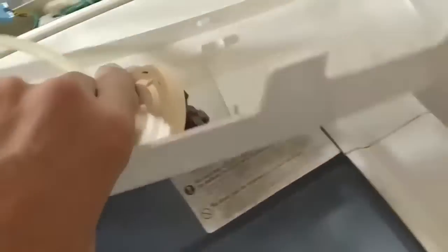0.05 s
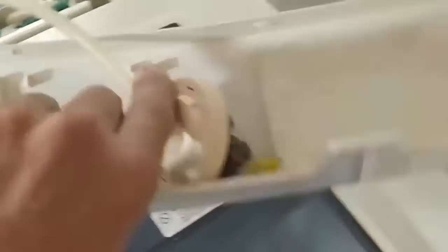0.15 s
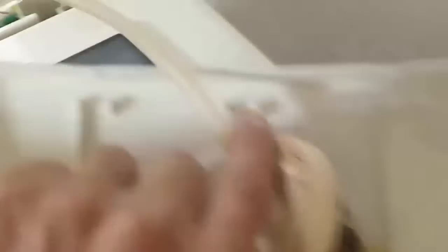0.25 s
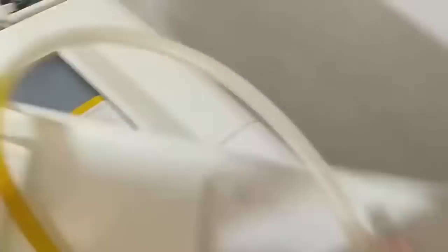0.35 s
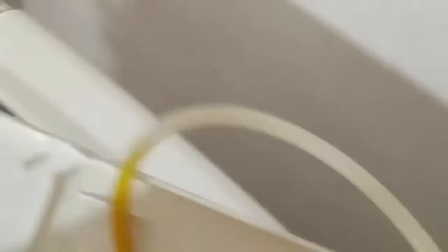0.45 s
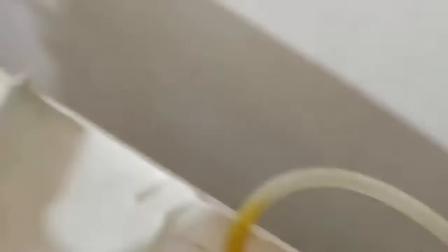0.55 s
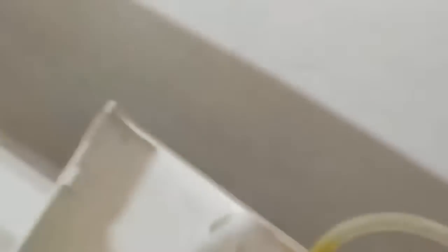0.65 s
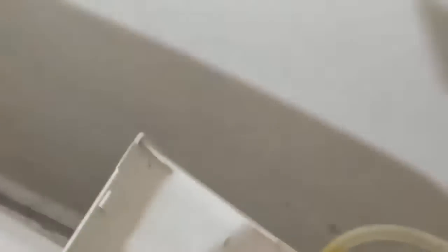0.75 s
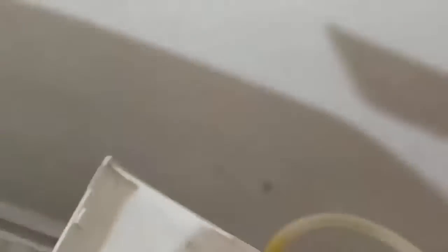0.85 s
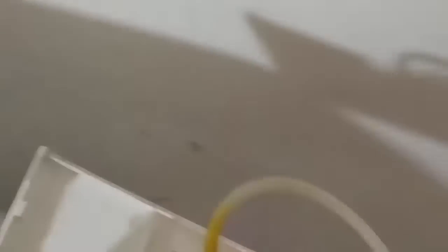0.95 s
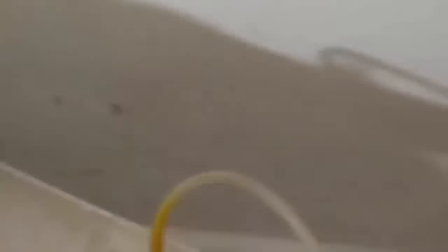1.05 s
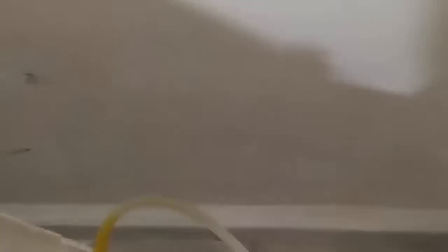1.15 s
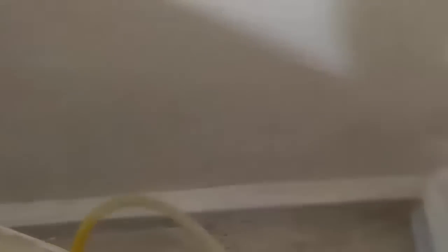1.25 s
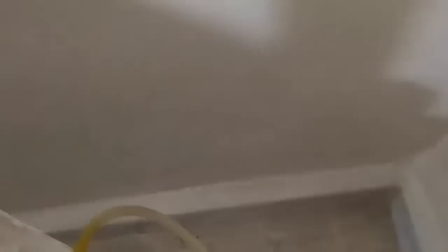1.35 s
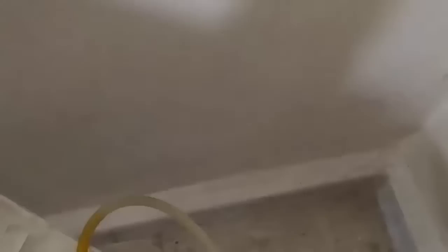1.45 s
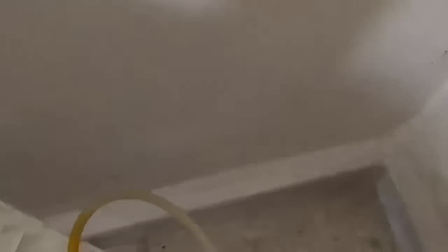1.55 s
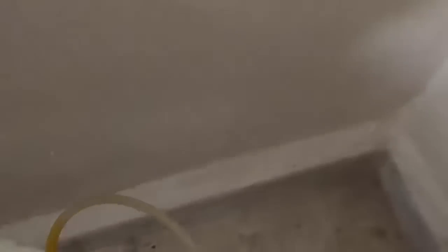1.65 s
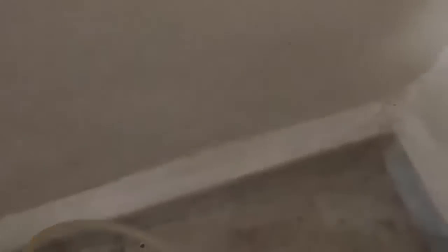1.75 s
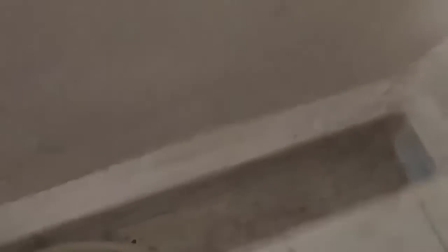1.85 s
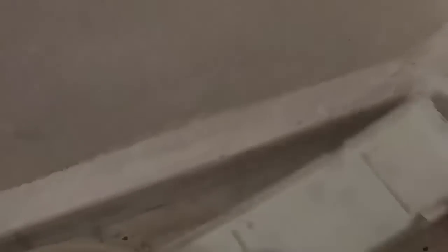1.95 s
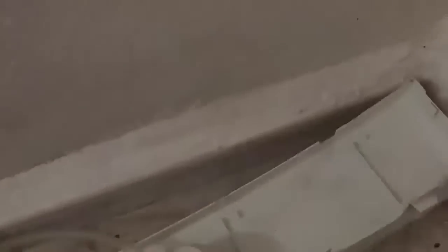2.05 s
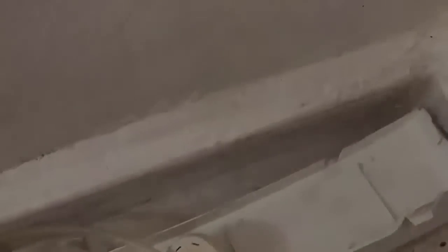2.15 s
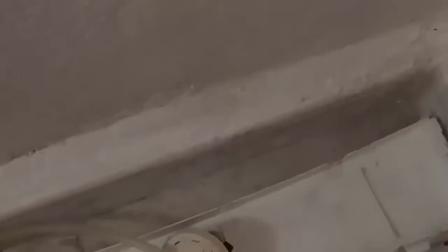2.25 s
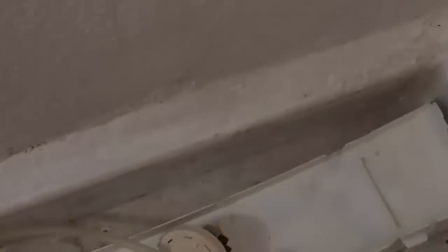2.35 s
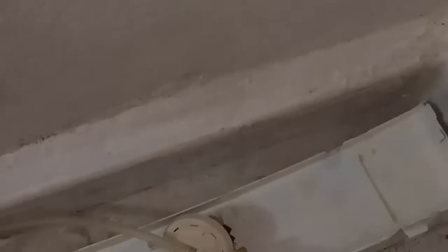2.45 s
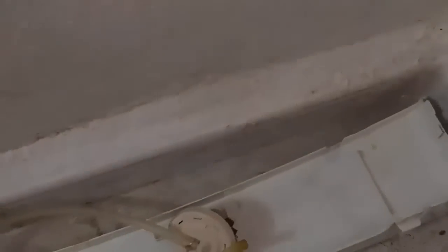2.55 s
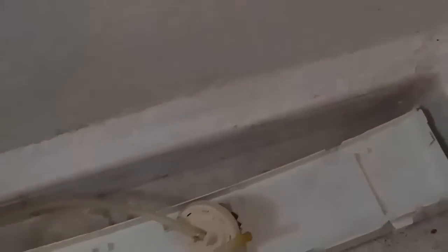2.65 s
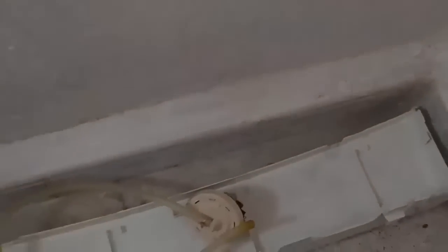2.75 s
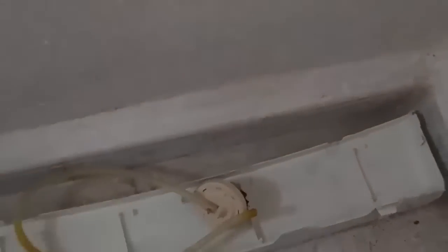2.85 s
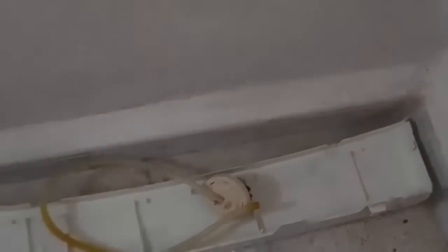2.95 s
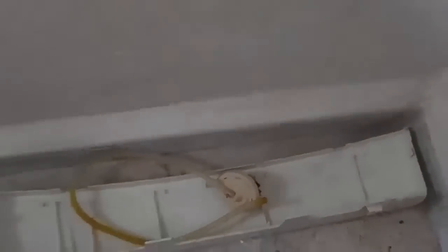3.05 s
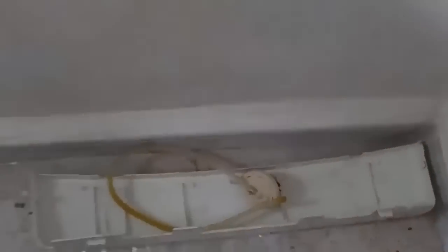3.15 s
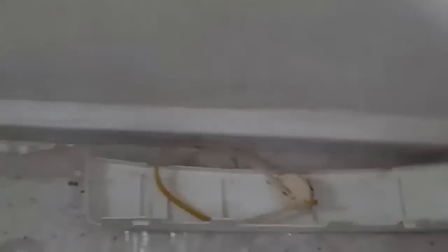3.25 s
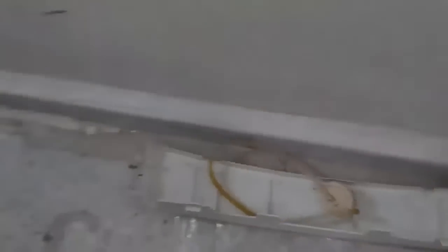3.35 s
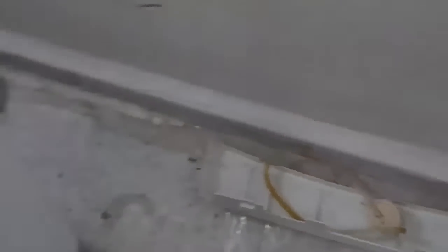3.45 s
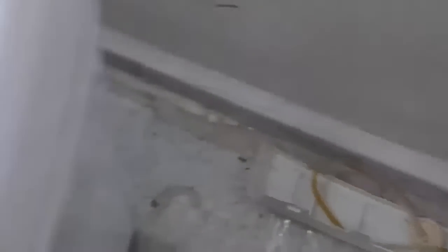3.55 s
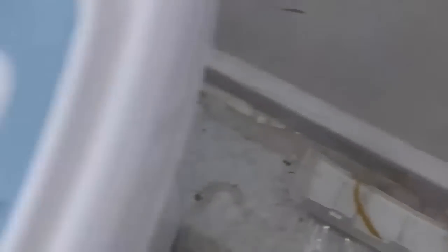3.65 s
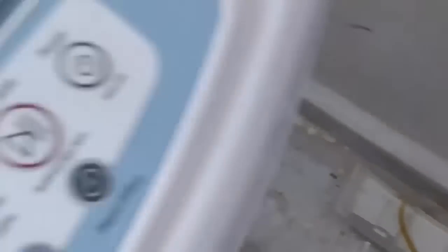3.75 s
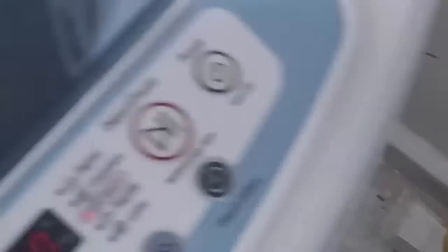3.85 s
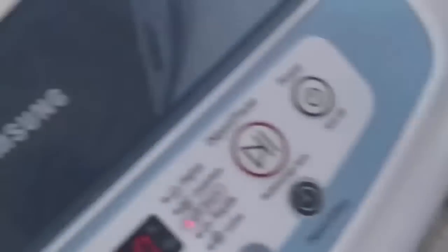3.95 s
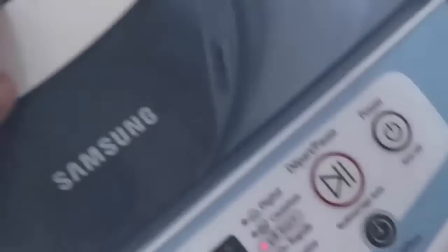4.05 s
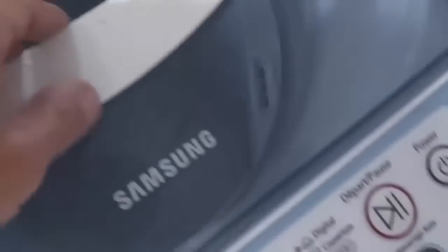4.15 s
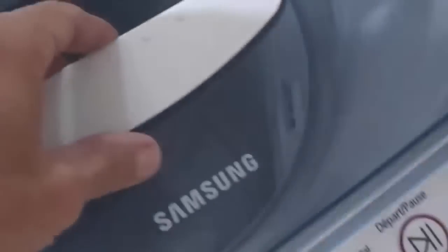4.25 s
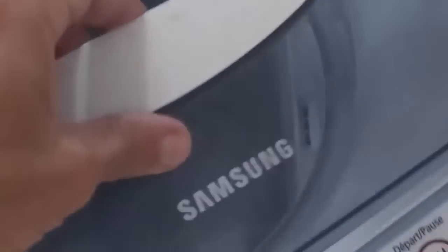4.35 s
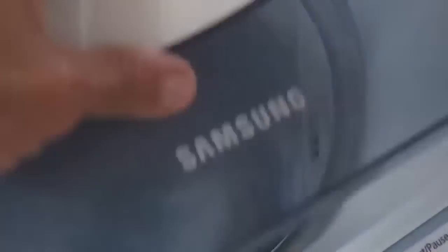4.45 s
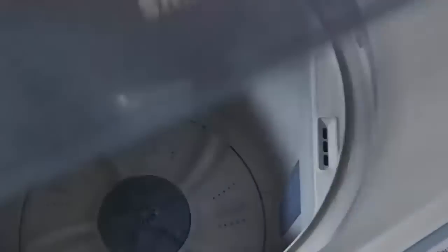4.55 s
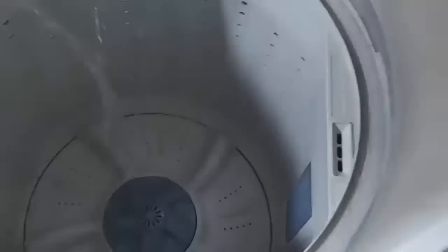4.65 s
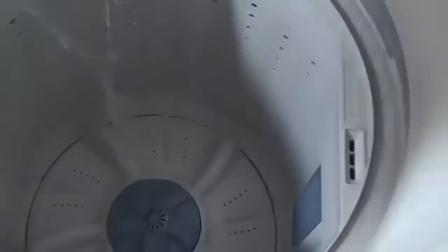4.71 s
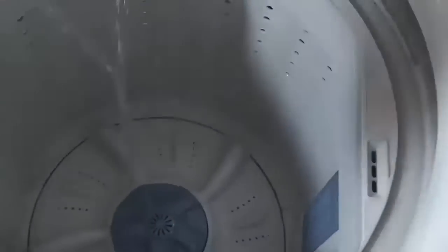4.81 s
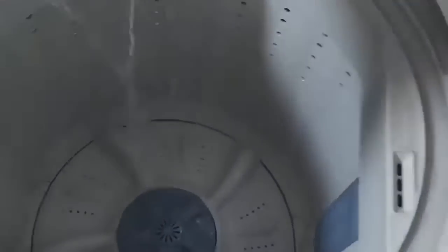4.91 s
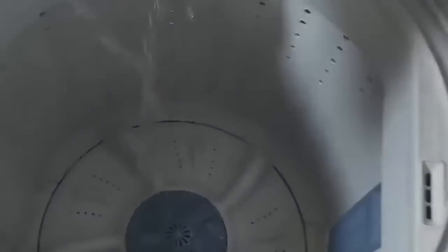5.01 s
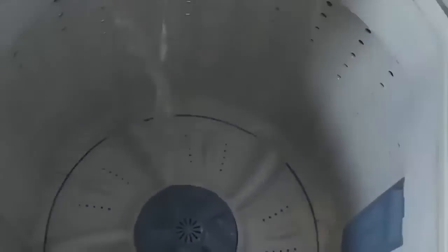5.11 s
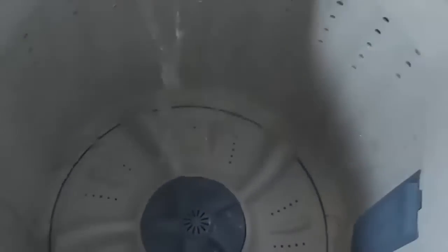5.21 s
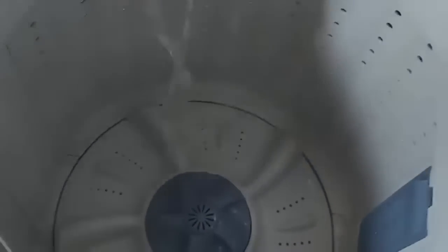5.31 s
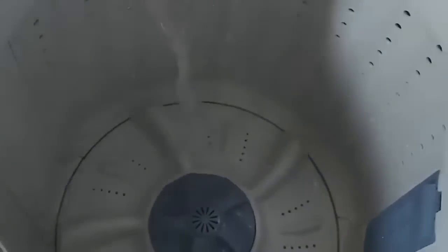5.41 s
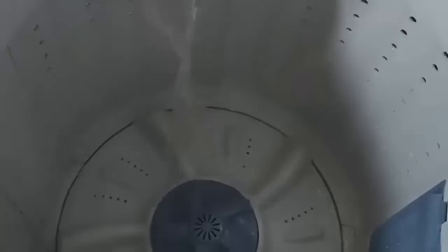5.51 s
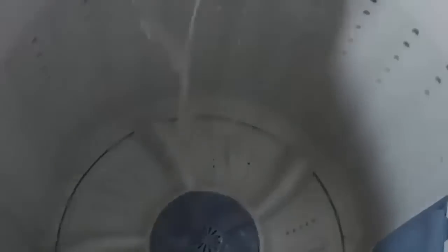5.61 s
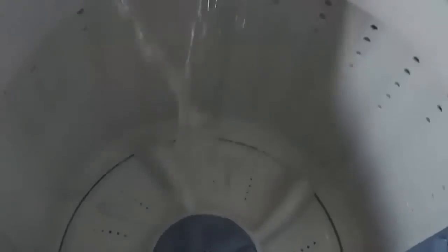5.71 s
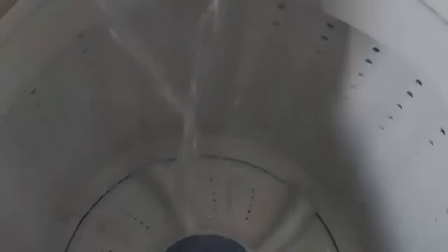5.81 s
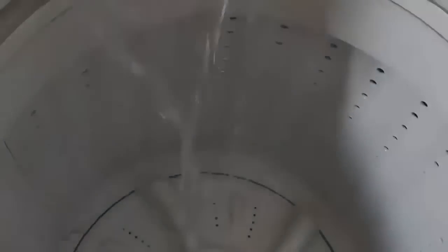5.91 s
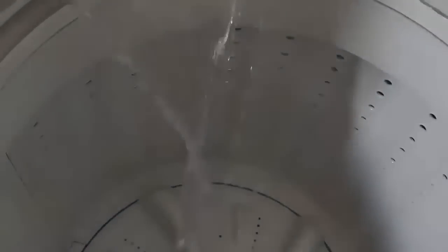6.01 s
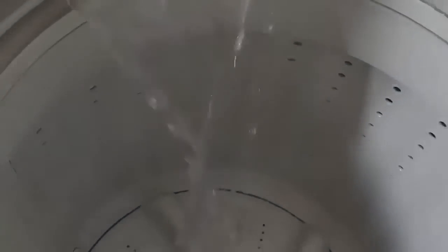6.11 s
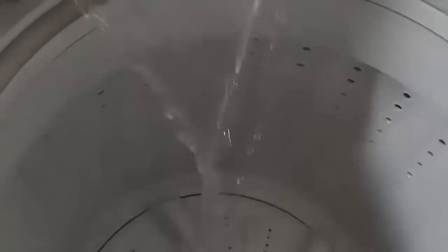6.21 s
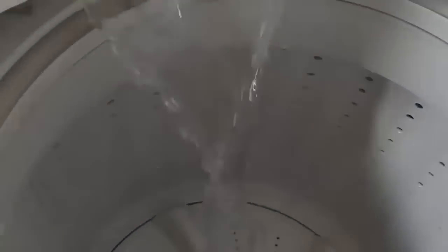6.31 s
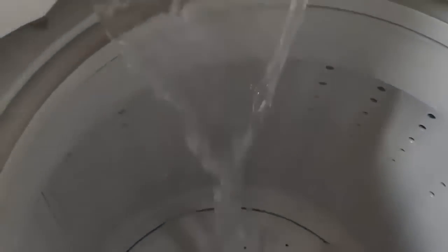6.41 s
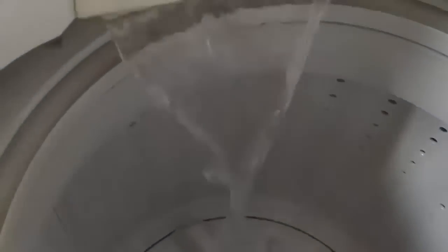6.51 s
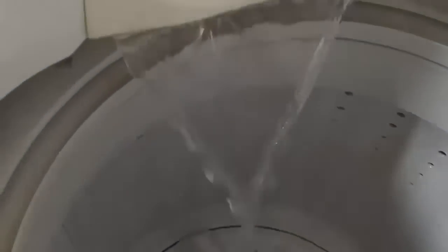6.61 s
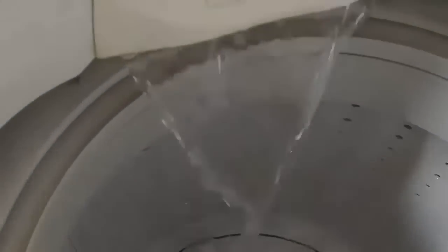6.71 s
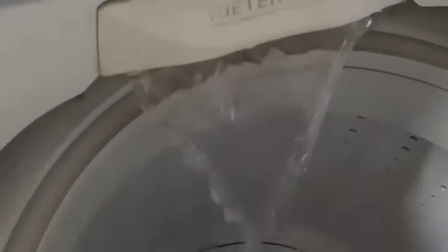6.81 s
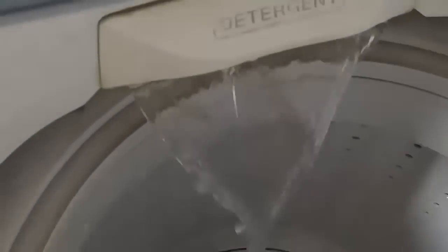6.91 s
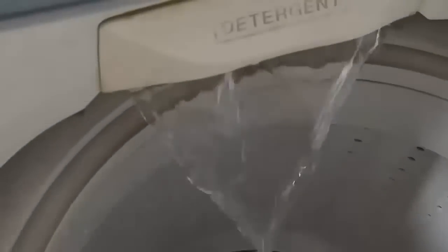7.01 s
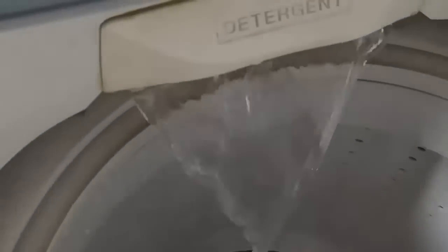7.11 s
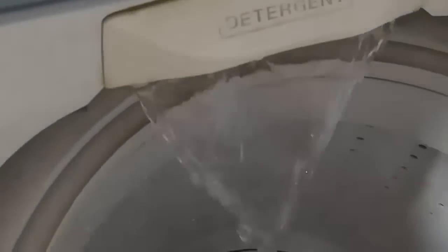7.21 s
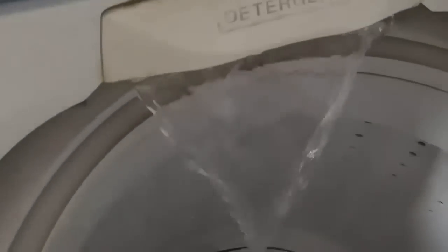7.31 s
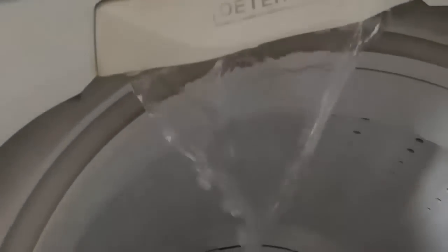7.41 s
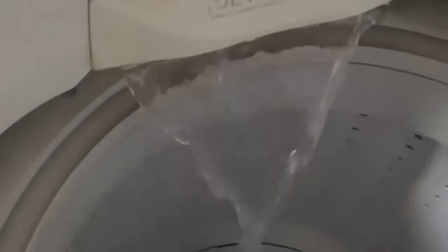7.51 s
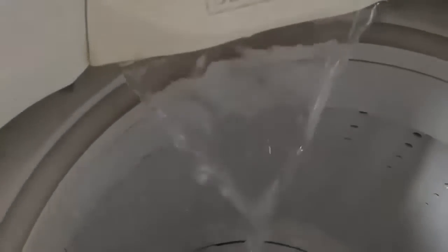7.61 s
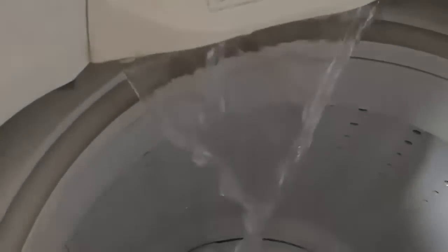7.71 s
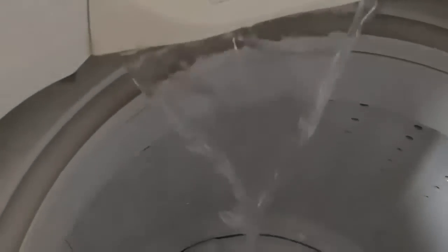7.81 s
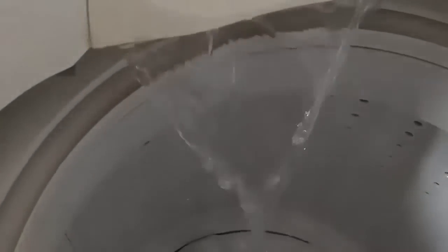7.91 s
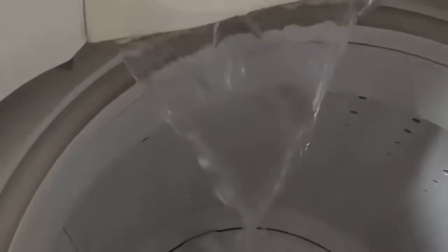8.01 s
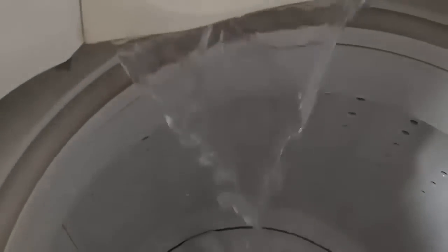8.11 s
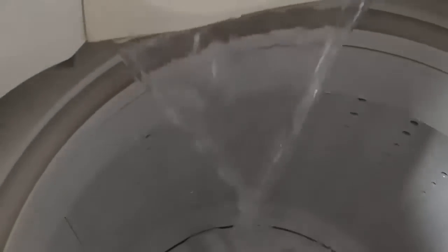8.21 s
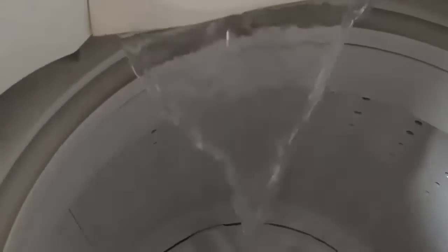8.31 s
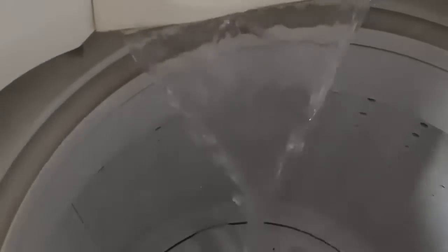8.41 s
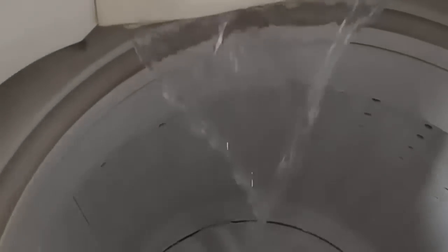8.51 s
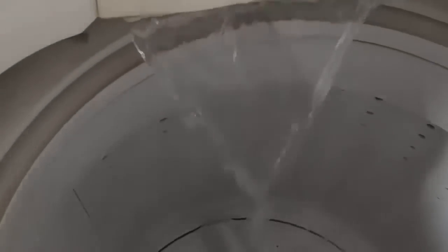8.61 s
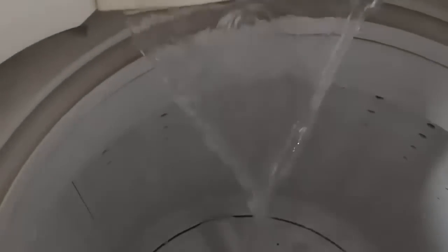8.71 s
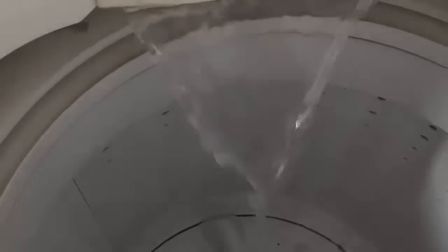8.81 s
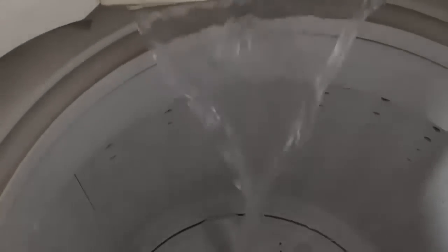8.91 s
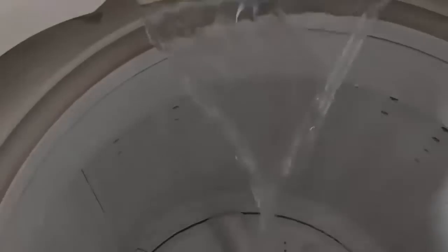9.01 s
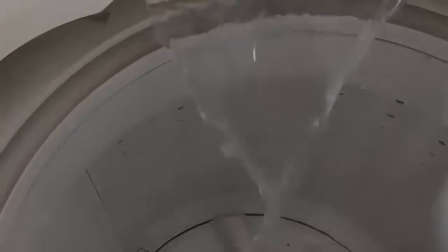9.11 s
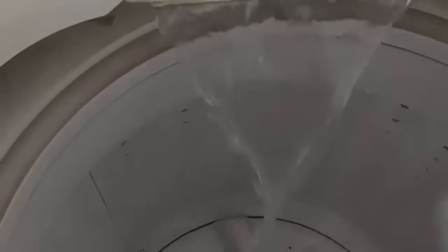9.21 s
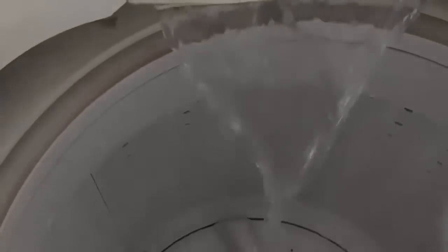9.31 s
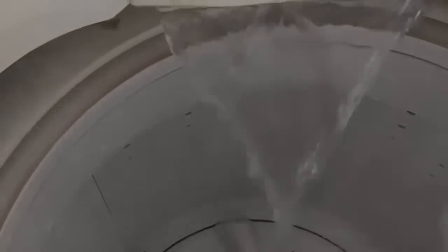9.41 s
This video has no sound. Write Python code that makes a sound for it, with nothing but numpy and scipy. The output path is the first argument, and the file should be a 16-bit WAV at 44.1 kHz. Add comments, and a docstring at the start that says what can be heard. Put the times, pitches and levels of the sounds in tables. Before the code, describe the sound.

A sharp hollow plastic knock rings over quiet running water, followed by small taps. Then the panel hits the floor, chattering and dragging with a short echo off bare walls. After a lull of soft hiss and low thrumming come light scuffs and handling ticks. The spray grows nearer, the lid thuds open, and uneven jets fizz, snap and patter in the tub, heard close up in stereo.

```python
"""A phone listens beside a top-loading washing machine that fills: the water is noise in bands that hiss and splat,
with ringing droplets and bubbles, and noise through resonances where the jet drums on the tub.
A loose plastic panel is knocked, bounces and is dragged down onto the floor, as chattering noise rings its modes;
then the phone moves over the machine, the lid is lifted with a knock and the spray opens up.
A small hard room answers the plastic with a tail of decaying noise."""
import sys
import numpy as np
from scipy import signal
from scipy.fft import rfft, irfft, next_fast_len
from scipy.io import wavfile
from scipy.ndimage import uniform_filter1d

SR = 44100
rng = np.random.default_rng(int(sys.argv[2]) if len(sys.argv) > 2 else 0)


def log_audio(samples):
    """Write samples as a 16-bit WAV file to the path given in sys.argv[1]."""
    # one column per channel
    frames = np.atleast_2d(samples).T
    # limit to full scale, then quantise
    limited = np.clip(frames, -1, 1)
    pcm = np.round(limited * 32767).astype(np.int16)
    wavfile.write(sys.argv[1], SR, pcm)


N = 417186

# The spray as the phone comes nearer. Each row: time in seconds, level in dB.
SPRAY_LEVEL = [(0.0, -49), (0.66, -46.5), (1.03, -50.5), (1.29, -49), (1.66, -45.5), (2.42, -48.5),
               (2.82, -49), (3.69, -47), (4.14, -37.5), (4.87, -35.5), (5.16, -36.5), (6.16, -33.5),
               (6.88, -35), (7.51, -32.5), (7.67, -34), (8.62, -37), (8.85, -33), (9.46, -35)]
# Resonances of the loose panel. Each row: frequency in Hz, relative level in dB, t60 in seconds.
PANEL_RESONANCES = [(281, 10, 0.061), (387, -15, 0.2), (440, -24, 0.2), (495, -2, 0.61), (562, 3.5, 0.15),
                    (692, 4, 0.018), (740.5, -4, 0.09), (825, 4, 0.12), (892, 8.5, 0.18), (964, 3.5, 0.14),
                    (988, 8, 0.066), (1057, 9, 0.095), (1180, 10.5, 0.037), (1230, 2, 0.039),
                    (1270, 8, 0.078), (1377, -4, 0.07), (1470, -18, 0.06), (1590, 2.5, 0.031),
                    (1755, 2, 0.022), (1890, 4, 0.012), (2220, -0.5, 0.018), (2510, -4, 0.014),
                    (2772, -3, 0.038), (2930, -6, 0.12), (3530, -14, 0.0061), (3970, -22, 0.0076),
                    (4900, -18, 0.0107)]
LEFT_LAG = 13  # samples by which the left port hears later
OPEN_DB = -36  # spray level with the lid open
BOOM_HZ = 440  # below it only a flat blow moves the whole sheet
KNOCK_BASS_ALIKE = 0.91  # share of the plastic's bass that both ports hear alike


def undb(db):
    """Gain of a level in dB."""
    return 10 ** (np.asarray(db) / 20)


def unit(x):
    """Scale to rms 1."""
    return x / np.sqrt(np.mean(x ** 2))


def curves(table):
    """Columns of a table joined by straight lines over time."""
    s, *columns = np.transpose(table)
    return [np.interp(np.arange(N) / SR, s, c) for c in columns]


def ports(size, alike, bass_alike=0.69):
    """White noise at two microphone ports: a shared part, later at the left, and a part of their own; common bass."""
    shared_hz = 950  # below it both ports hear nearly the same
    bass_lags = 9, 4  # samples; in the bass the ports are closer in time
    alike = np.clip(alike, 0, 1)
    source = rng.standard_normal(size)
    shared = np.array([np.roll(source, LEFT_LAG), source])
    apart = np.sqrt(alike) * shared + np.sqrt(1 - alike) * rng.standard_normal((2, size))
    common = np.array([np.roll(source, lag) for lag in bass_lags])
    to_common = signal.filtfilt(*signal.butter(2, shared_hz, fs=SR), common - apart)
    return apart + np.clip(bass_alike, 0, 1) * to_common


def colour(x, points):
    """Shape a spectrum by (Hz, dB) points, silent beyond them."""
    size = next_fast_len(x.shape[-1])
    hz = np.maximum(np.arange(size // 2 + 1) * SR / size, 1)
    f, db = np.transpose(points)
    gain = undb(np.interp(np.log(hz), np.log(f), db, -90, -90))
    return irfft(rfft(x, size) * gain, size)[..., :x.shape[-1]]


def ring(x, hz, t60):
    """One decaying mode, equal energy whatever its decay."""
    r = np.exp(-np.log(1000) / (max(t60, .002) * SR))
    turn = 2 * np.pi * hz / SR
    return signal.lfilter([np.sin(turn) * np.sqrt(1 - r * r)], [1, -2 * r * np.cos(turn), r * r], x)


def fade(x, t60):
    """Every impulse of power dies away exponentially."""
    return signal.lfilter([1], [1, -np.exp(-np.log(1e6) / (max(t60, .001) * SR))], x)


def walk(rate):
    """Random levels held 1 / rate s and slewed twice; spread near 1."""
    k = int(SR / rate)
    steps = np.repeat(rng.standard_normal(N // k + 1), k)
    return 1.3 * uniform_filter1d(uniform_filter1d(steps, k), k)[:N]


def sides(pan_db):
    """Left and right gains from the difference left minus right."""
    return undb(np.array([[pan_db], [-pan_db]]) / 2)


def moved(s):
    """0 before and 1 after a move of the phone, centred on s."""
    move_s = 0.32
    return np.clip((np.arange(N) / SR - s) / move_s + .5, 0, 1)


def room(x):
    """A diffuse tail off bare walls, duller than the blow; the right port's sound feeds it."""
    t60_s, level_db, top_hz = 0.75, -11, 4930
    t = np.arange(SR) / SR
    dull = signal.lfilter(*signal.butter(1, top_hz, fs=SR), ports(SR, 0.034, bass_alike=0.79))
    tail = dull * undb(-60 * t / t60_s) * (t > .006)  # the first 6 ms stay empty
    tail = tail / np.sqrt(np.sum(tail ** 2) / 2)
    return undb(level_db) * signal.fftconvolve(x[1:], tail, axes=1)[:, :N]


def drumming():
    """The jet thrums hollow notes, patters in the mids and rumbles below; the hand-held phone shakes in deepest bass."""
    # Hollow notes of tub, cabinet and room. Each row: frequency in Hz, width in Hz (t60 is 3.13 / width),
    # then level before the swell in dB: beside the cabinet, down by the wall, over the tub;
    # last, change as the tub fills in dB per second.
    drum_notes = [(94, 6.5, -67, -50.5, -80, 2), (145.9, 10.7, -47, -54.5, -51, -0.23),
                  (171.6, 12.5, -55, -61.5, -53.5, 0.63), (195.1, 12, -55.5, -58, -51, 1.3),
                  (221.8, 12, -52, -62, -59.5, 0.2), (259, 18, -54.5, -56, -52, -0.2),
                  (293.1, 8.9, -59.5, -53, -50.5, -0.6), (369.2, 14, -56, -74, -53.5, -0.5),
                  (397.3, 8.5, -59.5, -64.5, -55, -1.8), (428, 5.3, -61, -63, -64, -0.6)]
    # The drumming swells and sinks as a whole. Each row: time in seconds, change in dB.
    drum_swell = [(0.0, -2.5), (.42, 5), (.7, 0), (1.4, -2), (1.95, 0), (2.15, 7.5), (2.4, -6), (2.7, -3.5),
                  (3.6, -3), (4.7, 2), (5.2, 1), (5.9, 4.5), (6.2, 0.5), (7.05, -4), (7.3, 1), (8.2, -0.5),
                  (9.0, 2), (9.46, 0.5)]
    # The patter in the mids. Each row: time in seconds, level in dB.
    patter_level = [(0.0, -54.5), (1.3, -56.5), (2.7, -57.5), (3.2, -53), (3.8, -56.5), (4.6, -47),
                    (6.0, -49.5), (9.46, -50)]
    # Spectra of patter and rumble. Each row: frequency in Hz, relative density in dB per Hz.
    patter_colour = [(300, -32), (400, -6.5), (500, 5.5), (600, 7.5), (690, 0.5), (820, 5.5), (1100, -1),
                     (1600, -7.5), (2200, -11.5), (3000, -14)]
    rumble_colour = [(15, -40), (30, -36), (64, -33), (100, 5.5), (140, 5.5), (350, 3.5), (500, 2.5)]
    down_s, up_s, over_tub_s = 0.87, 2.85, 4.19  # the phone dips to the wall, comes up, leans over the tub
    waver_db, waver_per_s = 2.2, 5
    rumble_db = -56.5
    shake_db, held_still_s, still_db = -62, 4.0, -4  # the hand steadies over the tub
    down = moved(down_s) - moved(up_s)
    over = moved(over_tub_s)
    swell_db, = curves(drum_swell)
    over_for_s = np.arange(N) / SR - over_tub_s
    notes = 0
    for hz, width, beside_db, wall_db, tub_db, fill_db in drum_notes:
        place_db = beside_db + down * (wall_db - beside_db)
        place_db = place_db + over * (tub_db - beside_db + fill_db * over_for_s)
        db = place_db + swell_db + waver_db * walk(waver_per_s)
        notes = notes + undb(db) * unit(ring(ports(N, 1.0), hz, 3.13 / width))
    notes = signal.sosfilt(signal.butter(2, 45, "high", fs=SR, output="sos"), notes)
    shake = unit(colour(rng.standard_normal((2, N)), [(14, 6), (25, 14), (45, 2), (70, -6)]))  # own to each port
    shake = undb(shake_db + still_db * moved(held_still_s)) * shake
    patter = unit(colour(ports(N, .6), patter_colour)) * undb(curves(patter_level)[0] + 1.2 * walk(14))
    rumble = undb(rumble_db) * unit(colour(ports(N, 0.27, 0.21), rumble_colour))
    return shake + notes + patter + rumble


def droplets():
    """Swarms of like-sized droplets burst together, each ringing a few cycles; a closed lid hides them more than hiss."""
    swarm_db, swarm_s = -9.5, 0.012  # level beside the spray, longest spread of a swarm
    lo_hz, hi_hz = 2677, 12400  # range of a swarm's middle pitch
    out = np.zeros((2, N + SR))
    t = np.arange(int(.006 * SR)) / SR
    for when, pitch, size, side in rng.random(size=(1500, 4)):
        after, detune, own = rng.random(size=(8, 3)).T
        hz = (lo_hz * (hi_hz / lo_hz) ** pitch * (1 + 0.25 * (detune - .5)))[:, None]
        blips = np.sin(2 * np.pi * hz * t) * np.exp(-t * hz / 9) * np.minimum(t / 0.00034, 1)
        gain = undb(5 * size + 6 * own + 9 * pitch)
        starts = (when * N + after ** 2 * swarm_s * SR).astype(int)
        for i, blip in zip(starts, blips * gain[:, None]):
            out[0, i + int(2 * side * LEFT_LAG):][:len(t)] += blip
            out[1, i:i + len(t)] += blip
    level_db = curves(SPRAY_LEVEL)[0]
    lid_db = 0.036 * np.minimum(level_db - OPEN_DB, 0)
    return unit(out[:, :N]) * undb(level_db + swarm_db + lid_db)


def plops():
    """A spatter of bubbles of about one size rings out under the jet, rising a little in pitch."""
    # Each row: start in seconds, level in dB, middle pitch in Hz.
    bubbles = [(4.1587, -28, 2360), (4.1991, -25, 3700), (4.3488, -31, 3300), (4.3932, -28.5, 3300),
               (4.4276, -22, 3240), (4.4792, -13, 2730), (4.5887, -29, 3310), (4.6294, -43, 2600),
               (4.674, -30, 2420), (4.7244, -19, 3000), (4.892, -33, 2880), (4.9863, -20, 3100),
               (5.2128, -24, 3350), (5.2903, -25, 3060), (5.3849, -23, 4100), (5.4357, -33, 3360),
               (5.4716, -28, 3730), (5.546, -22, 4100), (5.648, -38, 2700), (5.6772, -19.5, 4470),
               (5.8134, -33, 3100), (5.9247, -17.5, 3820), (6.3677, -40, 3300), (6.5363, -23, 4270),
               (6.6665, -23, 3800), (6.739, -25, 3100), (6.7907, -24, 4300), (6.877, -31, 2950),
               (6.9393, -30, 2780), (7.1604, -25, 4480), (7.2237, -29, 4240), (7.274, -34, 2760),
               (7.3165, -23, 2680), (7.3539, -23, 4130), (7.4796, -33, 2970), (7.55, -28, 3480),
               (7.5959, -19.5, 3800), (7.722, -22, 3150), (7.8837, -24, 3310), (8.0099, -22, 3960),
               (8.083, -21, 3140), (8.1112, -20.5, 3100), (8.184, -22, 3320), (8.5308, -29, 4560),
               (8.576, -16, 3360), (8.688, -25, 3240), (8.865, -23, 4520), (8.9265, -27, 4000),
               (8.993, -28, 3400), (9.0376, -23, 3600), (9.224, -26, 3430), (9.274, -29, 3360)]
    decay_cycles, glide, pitch_spread = 6, 0.015, 0.3  # rise and scatter of pitch as shares
    cluster_s, late_db = 0.01, -5.5  # length of a cluster, level of its last bubbles
    out = np.zeros((2, N + SR))
    t = np.arange(SR // 20) / SR
    for (s, level_db, hz), chance in zip(bubbles, rng.random(size=(len(bubbles), 6, 3))):
        for detune, after, side in chance:
            f = hz * (1 + pitch_spread * (detune - .5))
            age = t * f / decay_cycles
            tone = np.sin(2 * np.pi * f * t * (1 + glide * age))
            blip = undb(level_db - 3.0 + late_db * after) * tone * np.exp(-age) * np.minimum(t / 0.0008, 1)
            i = int((s + cluster_s * after ** 2) * SR)
            out[0, i + int(2 * side * LEFT_LAG):][:len(t)] += blip
            out[1, i:i + len(t)] += blip
    return out[:, :N]


def spray():
    """Fine hiss in four bands, each flickering alone; big and small gulps snap, then fizz away in the tub."""
    # Spectrum of the spray. Each row: frequency in Hz, relative density in dB per Hz.
    spray_colour = [(1000, -6), (2000, -6.5), (3200, 2), (5300, -3), (8000, -0.5), (10500, 0.5),
                    (12500, -11), (16000, 10.5)]
    # The loudest gulps of the jet that hit the tub. Each row: time in seconds, strength in dB,
    # share of the 3 kHz band in dB, share of the 5.5 kHz band in dB.
    splats = [(3.9467, -39.5, 2.5, -25), (4.0814, -25.5, -29, -11), (4.1148, -24, -28, -17),
              (4.157, -31, -10, -22), (4.2071, -28, -8.5, -23), (4.3069, -27, -27, -21),
              (4.3484, -27.5, -4.5, -22), (4.3927, -17, -13, -10.5), (4.421, -18, -11.5, -12),
              (4.476, -19.5, -7, -17), (4.6296, -20, -13.5, -20), (4.689, -20, -25, -20),
              (4.723, -25, -3.5, -12), (4.741, -28.5, -5, -12), (4.788, -23.5, -25, -16),
              (4.8157, -20, -29, -24), (4.8901, -22, -18, -17), (4.986, -26.5, -8, -14),
              (5.115, -13.5, -23, -17), (5.198, -22.5, -16, -25.5), (5.227, -14, -12, -16),
              (5.306, -23, -17, -18), (5.393, -18, -20, -24), (5.435, -23, -6, -8),
              (5.472, -16, -16.5, -10), (5.537, -23, -15, -15), (5.549, -20, -11, -13),
              (5.605, -23, -14, -10), (5.613, -24, -23, -10), (5.6499, -20, -21, -19),
              (5.677, -12, -18, -13.5), (5.808, -21, -13, -13), (5.816, -23, -10, -13),
              (5.84, -24, -13, -9), (5.8876, -16.5, -18, -32), (5.938, -22, -20, -8),
              (6.031, -19, -39, -20), (6.043, -19.5, -30, -20), (6.194, -30, -15, -3),
              (6.2625, -30, -29, -21), (6.283, -19.5, -31, -19), (6.3503, -18, -31, -31),
              (6.369, -27, -12, -20), (6.4426, -37, -26, -16), (6.465, -19, -34, -27),
              (6.538, -23, -16, -7), (6.5934, -12, -27, -22), (6.667, -30, -15, -23),
              (6.721, -26.5, -9, -21), (6.741, -24.5, -10, -8), (6.793, -25.5, -14, -4),
              (6.878, -31, -13, -22), (6.938, -17.5, -20, -21), (7.118, -14.5, -41, -15),
              (7.1834, -24, -28, -10), (7.2233, -27, -10, -4), (7.2752, -19, -12.5, -17),
              (7.315, -12.5, -20, -15), (7.479, -22.5, -7.5, -17), (7.517, -30, -25, -26),
              (7.549, -16.5, -14, -12), (7.616, -20, -19, -12), (7.68, -23, -25, -15),
              (7.722, -19, -13, -26), (7.805, -24, -38, -14), (7.9795, -19, -16, -27),
              (8.022, -20, -24, -19), (8.033, -19, -22, -13), (8.0863, -27.5, -3.5, -5),
              (8.157, -18, -16, -10), (8.172, -20, -20, -15), (8.186, -29, -16, -6), (8.218, -26, -29, -25),
              (8.258, -19, -22, -14), (8.295, -20, -33, -22), (8.388, -15, -35, -15),
              (8.533, -20.5, -19, -9), (8.5745, -22, -12, -16), (8.608, -21, -29, -18),
              (8.629, -23, -29, -20), (8.688, -16, -16, -20), (8.706, -20, -27, -22), (8.84, -21, -23, -20),
              (8.867, -17, -21, -12), (8.884, -21.5, -20, -9), (8.928, -19.5, -14, -11),
              (8.943, -21, -20, -10), (8.982, -21, -25, -10), (8.997, -21, -13, -11),
              (9.034, -20.5, -7.5, -13), (9.272, -19.5, -17.5, -14), (9.417, -19, -14, -13)]
    lower_db, lower_follows = -44.5, 0.65  # lower bands with the lid open; dB per dB of spray level
    under_db, middle_db, top_db = -8.5, 1, -5.5  # 1.5 and 3 kHz beside the 3 kHz share; 10 kHz beside the strength
    neck_db, neck_s, big_gulp_db = -4.5, 0.021, -14  # the hiss thins just before a big gulp
    lumpy_db = 2  # a gulp breaks up into uneven spatter
    high_db, = curves(SPRAY_LEVEL)
    low_db = lower_db + lower_follows * (high_db - OPEN_DB)
    s, peak_db, low, mid = np.transpose(splats)
    splat_at = (s * SR).astype(int)
    when, size, *tint = rng.random(size=(600, 6)).T
    small_at = (when * N).astype(int)
    lumps = undb(2 * lumpy_db * walk(250))  # on power, hence twice
    big = np.zeros(N)
    big[splat_at] = np.minimum(undb(peak_db - big_gulp_db), 1)
    before = np.roll(fade(big[::-1], 3 * neck_s)[::-1] - big, -1)
    sputter_db = 1.36 * walk(60) + neck_db * np.minimum(before, 1)  # all bands sputter together
    # Each row: low edge in Hz, high edge in Hz, hiss in dB, snap t60, fizz t60 and rise in seconds.
    bands = [(840, 2460, -4.0, 0.012, 0.34, 0.0024), (2580, 4300, -4.0, 0.0058, 0.18, 0.0018),
             (4470, 7280, -6.0, 0.027, 0.17, 0.0013), (7700, 13130, 0.1, 0.014, 0.11, 0.001)]
    flows_db = [low_db, low_db, high_db, high_db]
    shares_db = [low + under_db, low + middle_db, mid, top_db]
    out = 0
    for band, flow_db, share_db, chance in zip(bands, flows_db, shares_db, tint):
        lo_hz, hi_hz, hiss_db, snap_s, fizz_s, rise_s = band
        band_pass = signal.butter(4, [lo_hz, hi_hz], "band", fs=SR, output="sos")
        noise = unit(signal.sosfilt(band_pass, colour(ports(N, 0.017), spray_colour)))
        steady = undb(flow_db + hiss_db)
        small = np.zeros(N)
        small[small_at] = undb(12 - np.log(size) + 11.5 * (chance - 4.5))  # most lie far under the hiss
        small = small * steady
        hits = np.zeros(N)
        hits[splat_at] = undb(peak_db + share_db)
        snap = fade(hits ** 2 + small ** 2, snap_s)
        fizz = fade((hits * undb(-4.5)) ** 2 + (small * undb(-14.0)) ** 2, fizz_s)
        rise = max(int(rise_s * SR), 1)
        burst = np.abs(uniform_filter1d(snap + fizz, rise, origin=(rise - 1) // 2)) * lumps
        flicker = undb(sputter_db + 1.8 * walk(45))
        out = out + noise * np.sqrt((steady * flicker) ** 2 + burst)
    return out


def drag():
    """Stick-slip grit shakes the sliding plastic and hisses; each stroke swells and dies away."""
    # Slides and scuffs. Each row: start in seconds, level in dB, rise in seconds, t60 of the decay in seconds,
    # share of the upper modes in dB, share of the hiss in dB.
    strokes = [(1.646, -20.5, 0.007, 0.54, -11, -14), (1.695, -34.5, 0.01, 0.2, 8, 1),
               (1.88, -39, 0.054, 0.28, 8.5, -25), (1.98, -38, 0.049, 0.6, -6, -18),
               (2.185, -52, 0.023, 0.16, 13, -10), (2.215, -66.5, 0.054, 0.39, 22, 10),
               (2.599, -67.5, 0.028, 0.29, 15.5, 21), (3.575, -47, 0.02, 0.065, 4, -10),
               (3.645, -56, 0.02, 0.15, 13, 2), (3.675, -40.5, 0.021, 0.08, -2, -7)]
    t = np.arange(N) / SR
    grit = ports(N, .35, KNOCK_BASS_ALIKE) * undb(3.5 * walk(110))
    lower_modes = [row for row in PANEL_RESONANCES if BOOM_HZ < row[0] < 1500]
    upper_modes = [row for row in PANEL_RESONANCES if row[0] > 1500]
    body = unit(sum(undb(db - 6.2 * (hz < 700)) * ring(grit, hz, t60) for hz, db, t60 in lower_modes))
    body = signal.sosfilt(signal.butter(4, BOOM_HZ, "high", fs=SR, output="sos"), body)
    upper = unit(sum(undb(db) * ring(grit, hz, t60) for hz, db, t60 in upper_modes))
    hiss = unit(colour(grit, [(2500, -5.0), (4000, 25), (9000, 11.0), (12000, -13.0), (16000, -16)]))
    out = 0
    for s, level_db, rise_s, t60, upper_db, hiss_db in strokes:
        since = np.maximum(t - s, 0)
        decay = undb(level_db - 60 * np.maximum(since - rise_s, 0) / t60)
        stroke = np.minimum(since / rise_s, 1) * decay
        out = out + stroke * (body + undb(upper_db) * upper + undb(hiss_db) * hiss)
    return out


def knocks(table, modes, alike):
    """Each blow chatters for a moment into the modes, struck at a new spot, and cracks in the treble."""
    blow_s, rattle_db, rise_s = 0.014, -7, 0.005  # t60 of the contact; the looser chatter after it; onset
    crack_colour = [(2000, 1), (3000, 1.5), (6000, 3.5), (9000, 10.5), (12000, -1.5), (16000, -11.0)]
    out = np.zeros((2, N + SR))
    t = np.arange(SR // 3) / SR
    above_boom = signal.butter(4, BOOM_HZ, "high", fs=SR, output="sos")
    for s, level_db, boom_db, bass_db, upper_db, crack_db, t60, pan_db in table:
        contact = undb(-60 * t / blow_s) + undb(rattle_db - 60 * t / t60)
        chatter = ports(len(t), alike, KNOCK_BASS_ALIKE) * contact * np.minimum(t / rise_s, 1)
        spot_db = 1.5 * rng.standard_normal(len(modes))
        rings = [(hz, undb(db + a) * ring(chatter, hz, ring_s)) for (hz, db, ring_s), a in zip(modes, spot_db)]
        boom = sum(x for hz, x in rings if hz < BOOM_HZ)
        rest = sum(x * undb(bass_db if hz < 900 else upper_db if hz > 1500 else 0)
                   for hz, x in rings if hz > BOOM_HZ)
        body = signal.sosfilt(above_boom, rest) + undb(boom_db) * boom
        body = .25 * body / np.sqrt(np.mean(body[:, :SR // 50] ** 2))  # rms of the first 20 ms
        crack = unit(colour(ports(len(t), alike), crack_colour))
        crack = crack * (undb(-60 * t / 0.0022) + undb(5.0 - 60 * t / t60))
        i = int((s - .003) * SR)
        out[:, i:i + len(t)] += undb(level_db) * sides(pan_db) * (body + undb(crack_db) * crack)
    return out[:, :N]


def scene():
    """Water throughout, plastic on top."""
    # Blows on panel and lid. Each row: time in seconds (the onset is 3 ms sooner), relative level in dB,
    # shares of boom, bass and upper modes in dB, crack in dB, t60 of the rattle in seconds, left minus right in dB.
    panel_knocks = [(0.38, -0.5, -7.5, 4.5, -12, -26, 0.18, 1.5),
                    (0.437, -17.5, -18, -7, -16, -32, 0.055, 8), (0.595, -15, -26, -11, 0.5, -28, 0.15, 3),
                    (0.749, -23, -21, -10, -1, -27, 0.19, 3), (0.978, -30, -22, -6, -34, -41, 0.089, 7),
                    (1.255, -32.5, -2, -5, -10, -24, 0.19, -1),
                    (1.466, 1.5, -42, 2, -6.5, -24.5, 0.092, -1),
                    (1.490, -10, -41, -17, -22, -30, 0.051, -7), (1.504, -8, -40, -8, -24, -26, 0.039, -5),
                    (1.522, -18, -36, -14, -19, -32, 0.048, -2), (1.644, -6.5, -33, -4, 9, -17, 0.13, -3),
                    (1.668, -9, -33, -6, -21, -23, 0.16, -1), (1.699, -20, -30, -18, 16, -8, 0.15, -5),
                    (1.711, -16, -19, -5, 12, -18, 0.12, -2), (1.747, -10, -28, -14, 19, -27, 0.099, -4),
                    (1.766, -12, -30, -22, -24, -38, 0.22, -9), (1.798, -26, -26, -13, -16, -34, 0.1, -4),
                    (1.872, -18, -30, -5, -1, -37, 0.034, 0), (1.918, -25, -31, -16, 0, -39, 0.06, -10),
                    (1.944, -28, -30, -8, 23, -26, 0.071, 0.5), (1.968, -24, -28, -8, -2, -26, 0.06, -4),
                    (2.05, -26.5, -30, -1, -7, -19, 0.073, -2)]
    lid_knocks = [(2.366, -29, 17.5, -13, -29, -30, 0.022, 14), (3.715, -33.5, 5, 10, -32, -30, 0.039, 0),
                  (3.853, -33.5, 6, 19, -8, -22, 0.22, 0.44), (3.946, -27.5, 6, -1, -26, -13, 0.47, 0.6),
                  (4.67, -10.5, -8.5, 0.5, -27, -21, 0.2, 3), (7.515, -26, -8, -4, -30, -35, 0.03, -3)]
    # Resonances of the lid. Each row: frequency in Hz, relative level in dB, t60 in seconds.
    lid_resonances = [(209, 5.5, 0.051), (316, -10.5, 0.043), (343, 2.5, 0.067), (427, -6, 0.048),
                      (530, -24, 0.026), (645, 4, 0.041), (810, -4, 0.022), (960, 3, 0.03),
                      (1120, 2, 0.027), (1290, 2, 0.027), (1450, -2, 0.011), (1640, 26, 0.027),
                      (1920, 13, 0.0098), (2280, 26, 0.0099), (2700, 23, 0.018)]
    panel = knocks(panel_knocks, PANEL_RESONANCES, 0.2)
    lid = knocks(lid_knocks, lid_resonances, 0.38)
    plastic = panel + lid + drag()
    # light plastic radiates little bass
    plastic = signal.sosfilt(signal.butter(2, 150, "high", fs=SR, output="sos"), plastic)
    water = spray() + droplets() + plops() + drumming()
    return water + plastic + room(plastic)


def record(dry):
    """The phone rounds the loudest peaks and cuts the top above 16 kHz."""
    rounded = .9 * np.tanh(dry / .9)
    return signal.sosfilt(signal.ellip(12, .3, 100, 16000, fs=SR, output="sos"), rounded)


dry = scene()
out = record(dry)
log_audio(out)
```